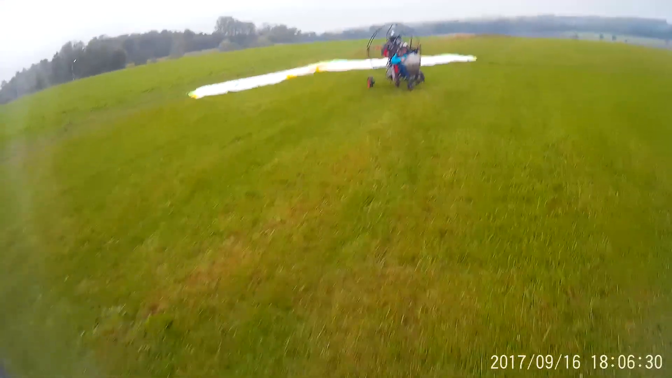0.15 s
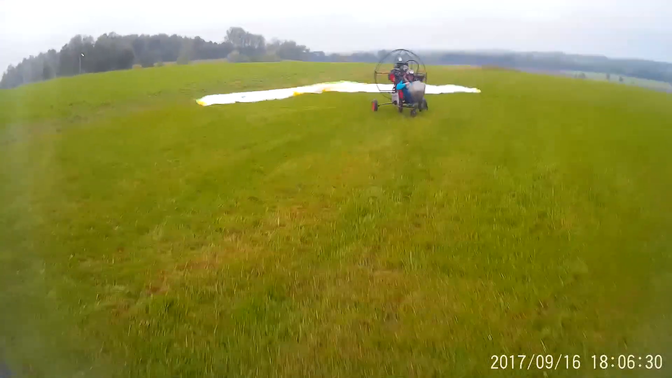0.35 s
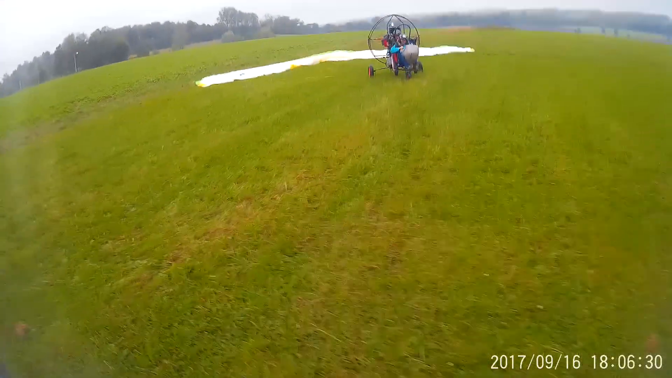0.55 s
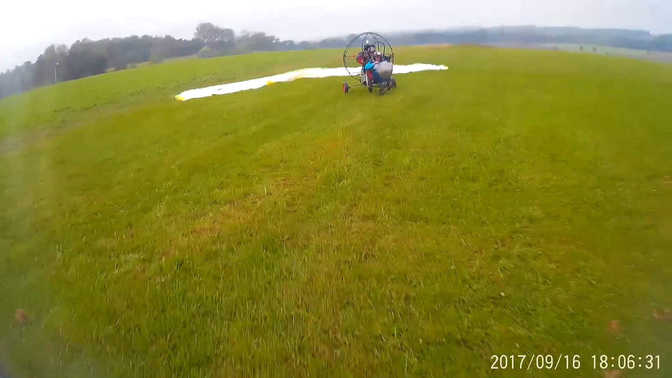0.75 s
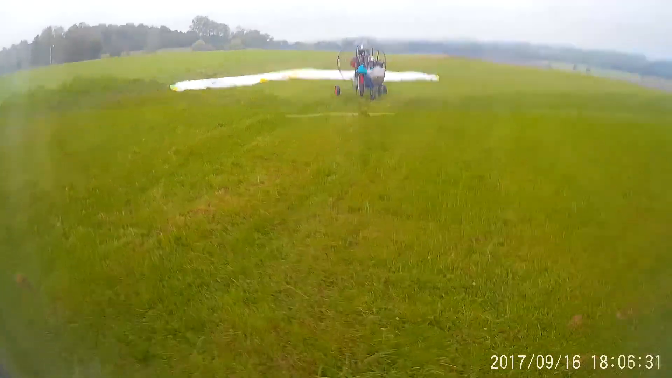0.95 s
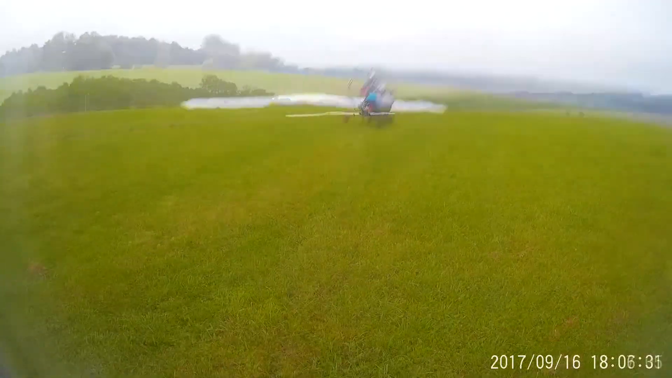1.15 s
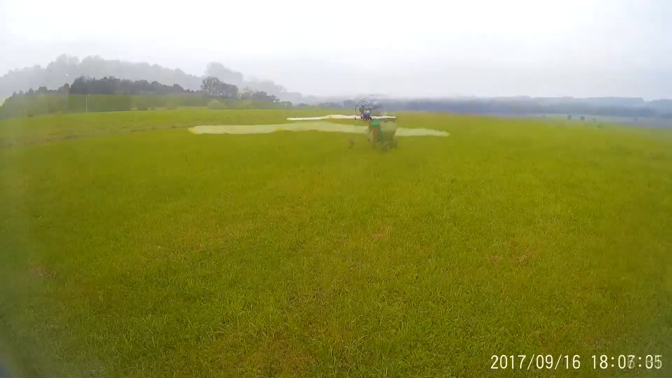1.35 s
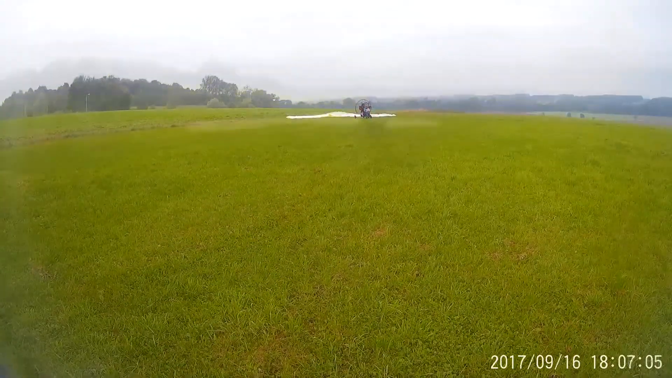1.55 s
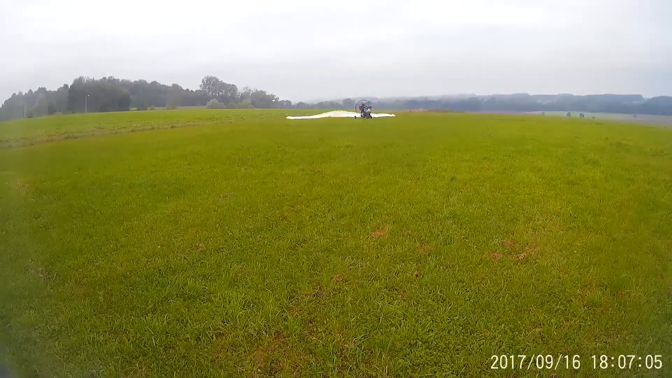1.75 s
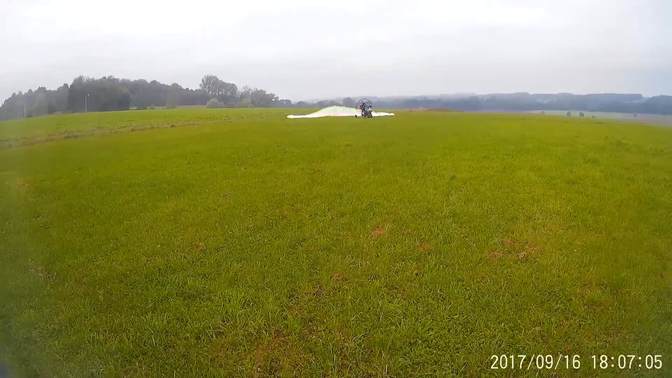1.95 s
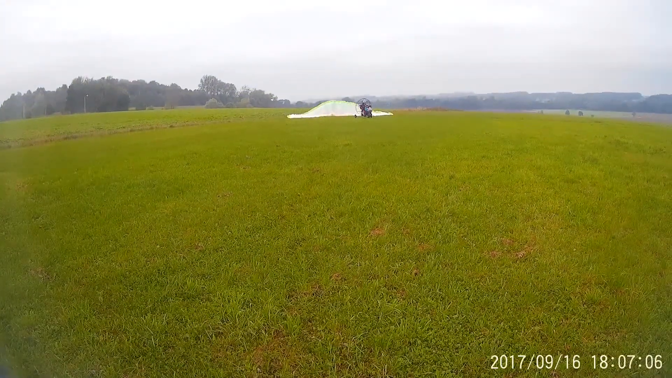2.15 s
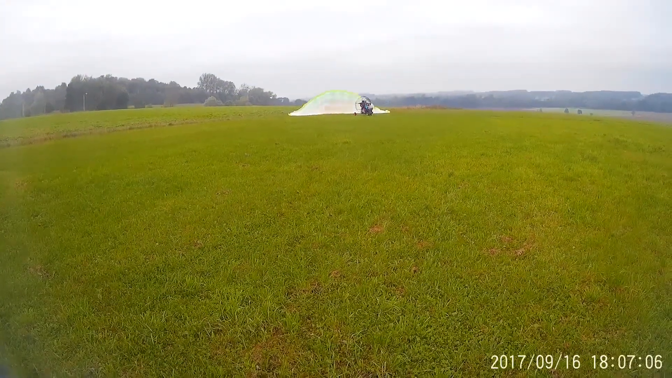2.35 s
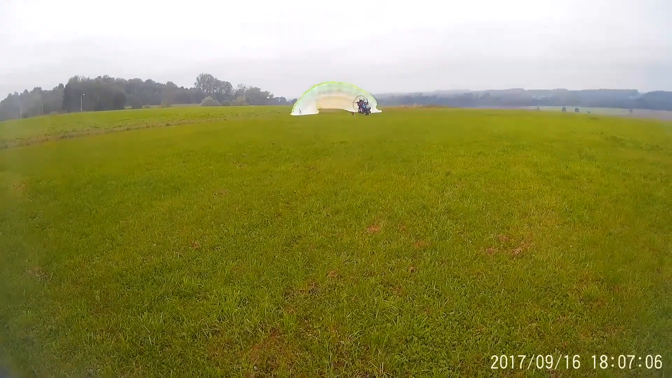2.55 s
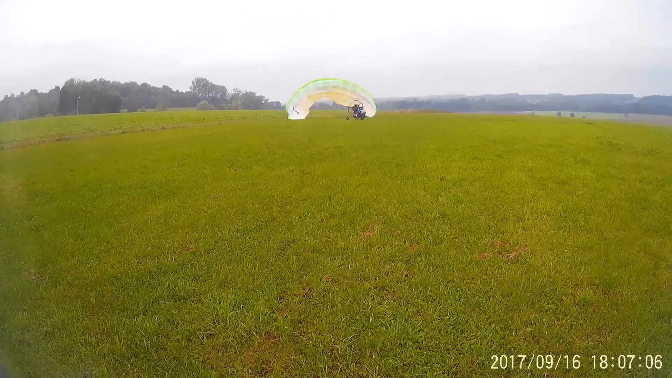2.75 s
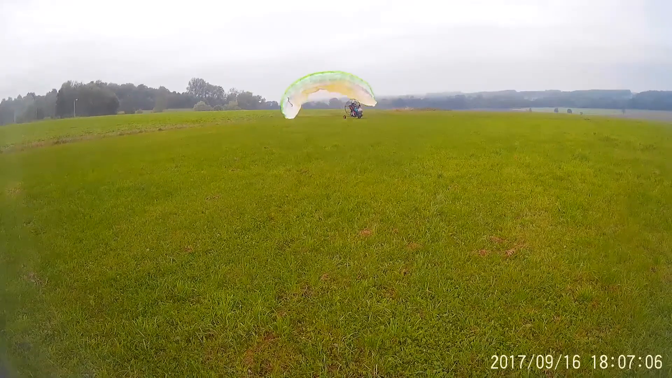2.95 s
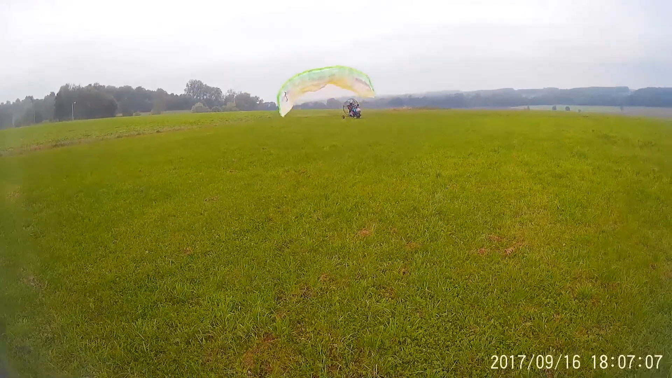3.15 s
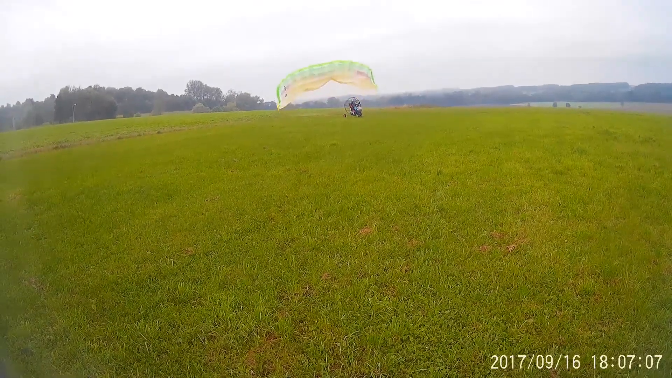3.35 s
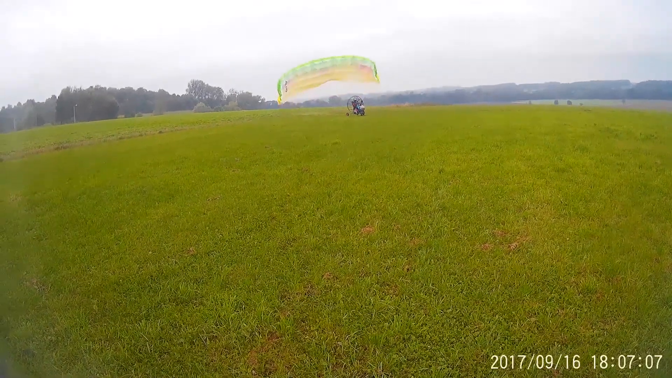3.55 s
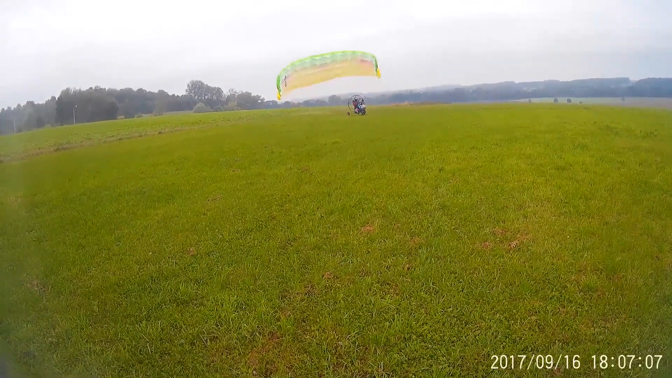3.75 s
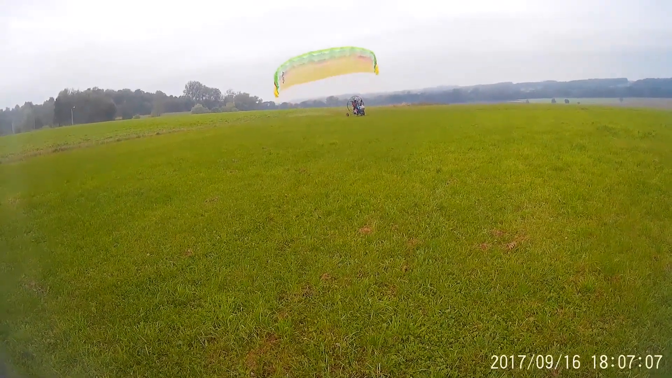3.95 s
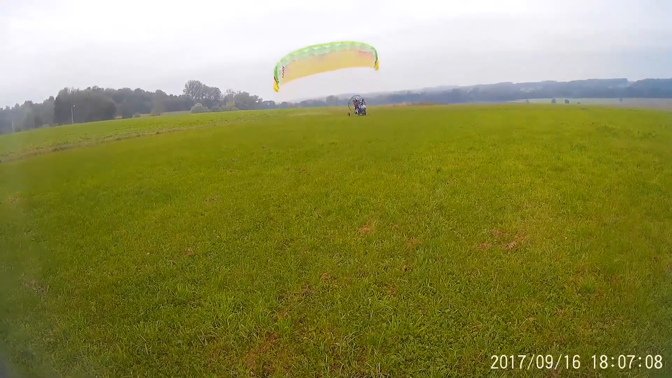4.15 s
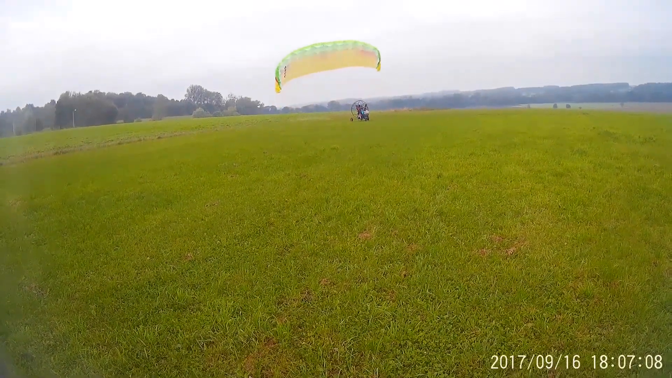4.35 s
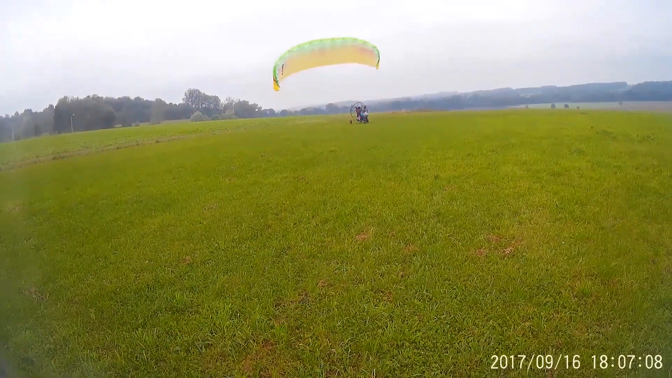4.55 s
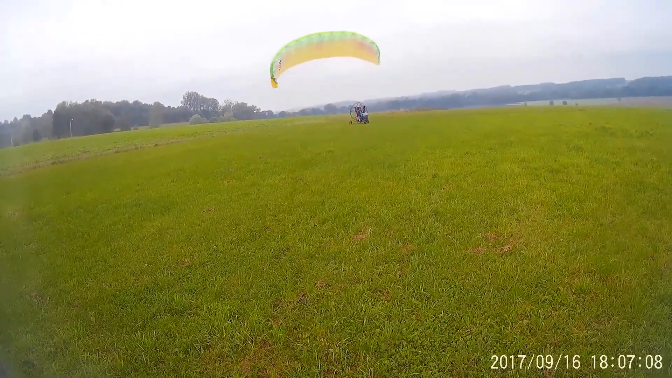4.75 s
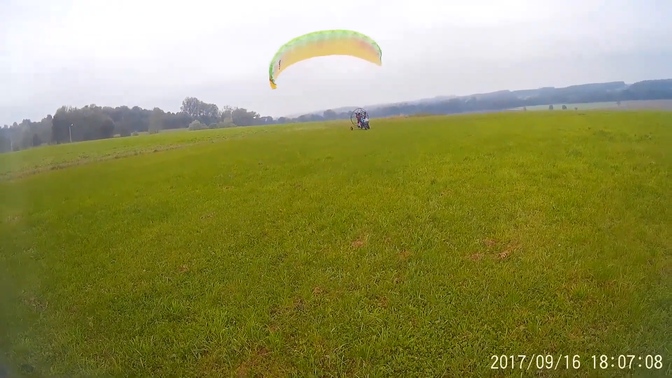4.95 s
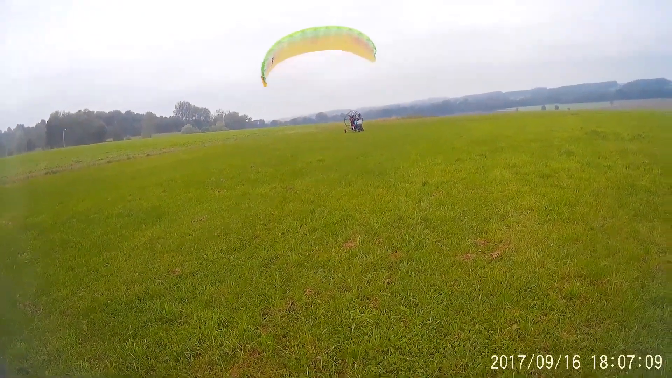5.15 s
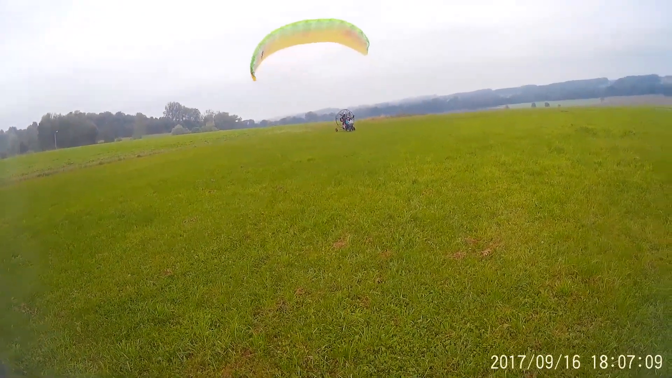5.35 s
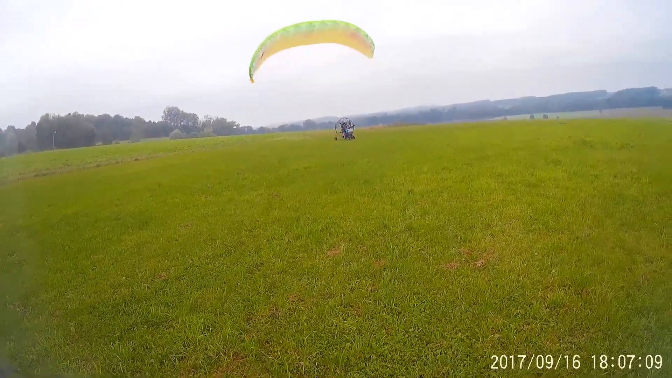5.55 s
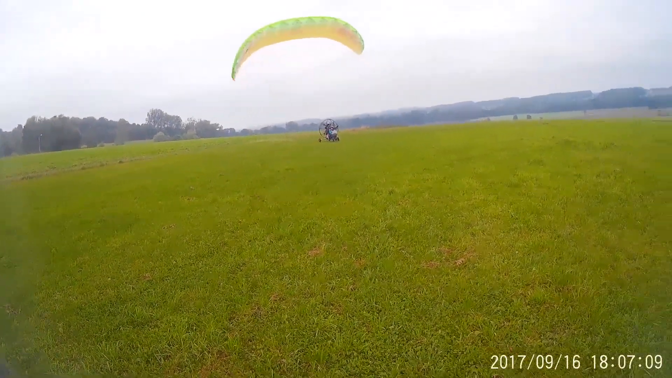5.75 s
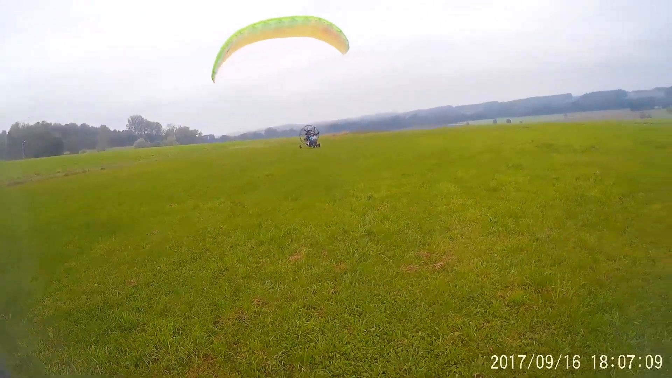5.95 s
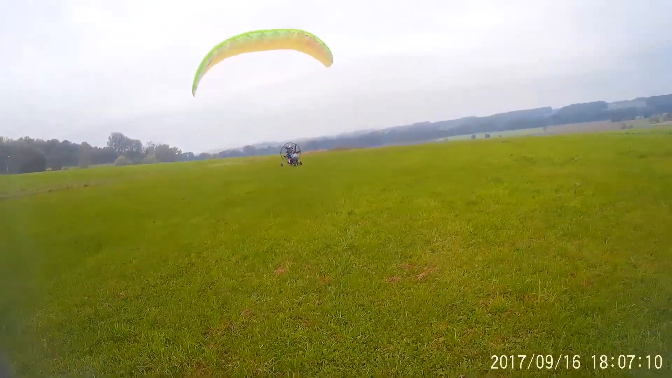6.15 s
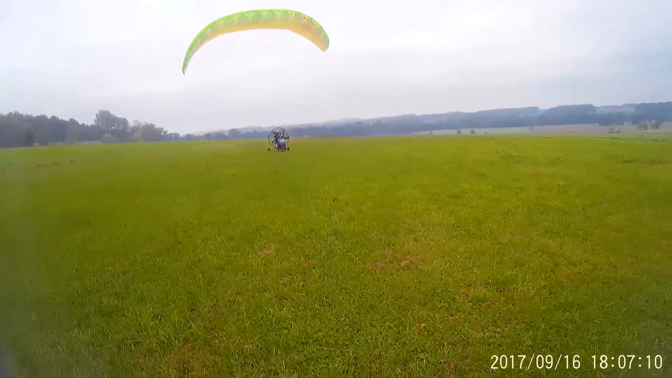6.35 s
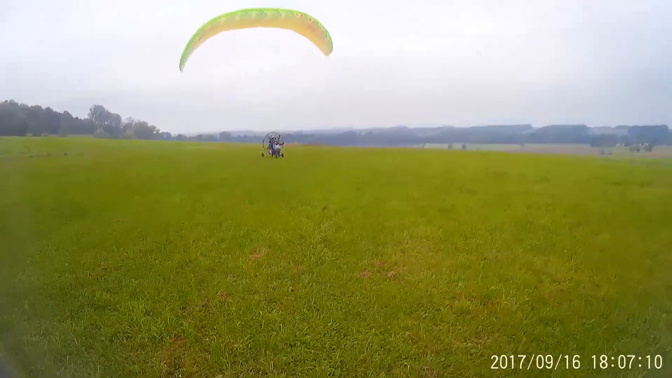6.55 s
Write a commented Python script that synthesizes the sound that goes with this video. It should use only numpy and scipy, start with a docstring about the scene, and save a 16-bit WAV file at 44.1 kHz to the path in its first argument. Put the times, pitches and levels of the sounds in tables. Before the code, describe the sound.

Quiet outdoor background with a few sharp taps and dull thumps close to the microphone, then a small two-part drone of engine and propeller at some distance. It revs up, settles into a fluttering buzz with rushing, torn air, and keeps growing brighter and louder without passing. The enclosed camera microphone makes it hollow and ringing. A last soft handling bump falls near the end.

```python
"""Paramotor trike take-off

A paramotor trike opens its throttle and takes off across a grass field, heard through a small camera's case.
Engine and propeller are two stacks of harmonics, geared slightly apart so that they beat.
Their rasp and the noise of torn air ring in the case's resonances near 2 kHz.
The hand knocks and clicks the case a few times; shaped noise makes a light wind rumble and a hiss."""
import sys
import numpy as np
from scipy import signal
from scipy.fft import rfft, irfft
from scipy.io import wavfile

SR = 44100
rng = np.random.default_rng(int(sys.argv[2]) if len(sys.argv) > 2 else 0)


def persist_wave(psi):
    """Save psi, clipped to +-1, as 16-bit WAV."""
    counts = np.round(np.clip(psi, -1, 1) * 32767).astype(np.int16)
    wavfile.write(sys.argv[1], SR, np.atleast_2d(counts).T)


N = 291060  # length [samples]


def from_db(db):
    """Decibels to gain."""
    return np.exp(np.asarray(db) * (np.log(10) / 20))


def rms_one(x):
    """The same sound at rms 1."""
    return x / np.sqrt(np.mean(x * x) + 1e-20)


def in_time(rows):
    """A (time [s], value) curve at every sample."""
    times, values = np.transpose(rows)
    return np.interp(np.arange(N) / SR, times, values)


def bins():
    """Frequency [Hz] of every bin of a full-length spectrum, at least 1."""
    return np.maximum(np.arange(N // 2 + 1) * SR / N, 1)


def colour(points):
    """Gain of a (frequency [Hz], level [dB]) spectrum at every bin, interpolated over log frequency."""
    hz, db = np.transpose(points)
    return from_db(np.interp(np.log(bins()), np.log(hz), db))


def tinted(x, gain):
    """A sound with the given gain at every bin; rms 1."""
    return rms_one(irfft(rfft(x) * gain, N))


def drift(rate):
    """Smooth random wander of rms about 1, low-passed at rate [Hz] and drawn at every 50th sample."""
    size = N // 50 + 2
    hz = np.arange(size // 2 + 1) * SR / N
    spectrum = rfft(rng.standard_normal(size)) / (1 + (hz / rate) ** 2)
    slow = rms_one(irfft(spectrum, size))
    return np.interp(np.linspace(0, size - 1, N), np.arange(size), slow)


def ring(x, hz, t60):
    """Two-pole resonator: a unit click sets a sine of height 1 ringing, 60 dB down after t60 [s]."""
    radius = from_db(-60 / (t60 * SR))
    angle = 2 * np.pi * hz / SR
    feedback = [1, -2 * radius * np.cos(angle), radius * radius]
    return signal.lfilter([0, np.sin(angle)], feedback, x + 1e-18)


def brighten(x, shelf_db, corner_hz):
    """Raises or lowers what lies above the corner."""
    top = irfft(rfft(x) / (1 + (corner_hz / bins()) ** 8), N)
    return x + (from_db(shelf_db) - 1) * top


def hiss():
    """Quiet field and microphone hiss: steadily coloured noise with a bump at 2 kHz."""
    # colour of the hiss: (frequency [Hz], relative level per Hz [dB])
    hiss_colour = [(100, 7.5), (250, 6.5), (450, 3), (700, -1.5), (1100, -3), (1550, -4.5), (2000, -1.5),
                   (2500, -6.5), (4000, -8.5), (7000, -10), (11500, -10.5), (14200, -15), (15800, -24)]
    # level of the hiss: (time [s], level [dB])
    hiss_level = [(0, -61.5), (.85, -63), (1.1, -65.5), (1.35, -63.5), (1.7, -59.5), (6.6, -62)]
    return from_db(in_time(hiss_level)) * tinted(rng.standard_normal(N), colour(hiss_colour))


def wind():
    """Wind and handling rumble on the case: low noise in small gusts, settling once the camera is held still."""
    # level of the rumble: (time [s], level [dB])
    wind_level = [(0, -58), (.45, -52), (1.1, -57), (1.3, -63.5), (6.6, -63)]
    # colour of the rumble: (frequency [Hz], relative level per Hz [dB])
    rumble_colour = [(12, 4), (25, -5.5), (50, -11.5), (100, -16), (200, -19), (400, -31.5), (1000, -40)]
    gusts_db = 0.5 * drift(rate=5.8)
    return from_db(in_time(wind_level) + gusts_db) * tinted(rng.standard_normal(N), colour(rumble_colour))


def knocks():
    """Dull knocks of the hand: each pulls and pushes the case once, and leaves it ringing low."""
    # (time [s], push peak [dB], push peak after centre [ms], ring [Hz], ring level re peak [dB])
    knock_list = [(0.289, -44.5, 1.8, 189, -13), (0.4127, -21.5, 0.76, 158, -11.5),
                  (0.444, -38, 1, 139, -19), (0.6222, -23.5, 0.96, 105, -23),
                  (0.6275, -24.5, 0.91, 103, -4), (5.048, -42.5, 1.4, 125, -1), (6.128, -47, 2.3, 140, -12),
                  (6.2971, -29, 1.04, 168, -13)]
    body_t60_s = 0.098
    out = np.zeros(N)
    for s, peak_db, half_ms, ring_hz, ring_db in knock_list:
        span = np.arange(round((s - .05) * SR), round((s + .25) * SR))
        t = span / SR - s
        u = t / (half_ms / 1000)
        push = u / (1 + u * u / 5) ** 3   # dips at u = -1, peaks at u = 1
        since = np.maximum(t, 0)
        tail = np.sin(2 * np.pi * ring_hz * since) * from_db(-60 * since / body_t60_s)
        out[span] += from_db(peak_db) * (push / push.max() + from_db(ring_db) * tail)
    return out


def clicks():
    """Taps and sharp snaps on the plastic case; a soft contact barely stirs its high modes."""
    # impulses: (time [s], level before the contact's low-pass [dB], hardness as that low-pass [Hz])
    click_list = [(0.4113, -17.5, 870), (0.6216, -20, 15100), (0.6226, -15.5, 8000), (0.6285, -22, 560),
                  (6.2970, -27, 400)]
    # modes of the case: (frequency [Hz], level [dB], decay by 60 dB [s])
    modes = [(313, -8, 0.023), (520, -12, 0.016), (1120, -13, 0.012), (1380, -8, 0.015), (1720, -5.5, .018),
             (2220, -3, 0.0057), (2720, 0.5, 0.0075), (3880, -4, 0.0049), (4630, -4.5, 0.0035),
             (5900, -1.5, 0.0027), (8230, -15, 0.0047), (9600, -11, .002), (12500, -22, 0.0026)]
    hits = np.zeros(N)
    for s, db, contact_hz in click_list:
        contact = signal.butter(4, contact_hz, fs=SR, output="sos")
        impulse = signal.unit_impulse(N, round(s * SR)) + 1e-18
        hits += from_db(db) * signal.sosfilt(contact, impulse)
    out = np.zeros(N)
    for k, (hz, db, t60) in enumerate(modes):
        out += (-1) ** k * from_db(db) * ring(hits, hz, t60)   # alternating polarity
    return out


def case_gain(hz):
    """Gain of the case's steep-sided resonances, which colour harmonics and rushing air alike."""
    # (centre [Hz], width [Hz], gain [dB])
    resonances = [(1053, 106, -15), (1406, 100, -11), (1802, 124, -5.5), (2002, 164, 1), (2212, 146, -0.5),
                  (2513, 100, -12), (2874, 178, -8.5), (3355, 220, -11), (4013, 425, -20.5),
                  (4670, 140, -22), (5500, 610, -23.5), (7340, 380, -32.5)]
    power = 1e-6
    for centre, width, db in resonances:
        skirt = 1 + ((hz - centre) / width) ** 2
        power = power + from_db(db) ** 2 / skirt ** 3
    return np.sqrt(power)


def rush(firings, blades):
    """Gas puffs at each firing and air torn by each blade: pulsing noise, ringing in the case; rms 1."""
    # propeller wash under the resonances: (frequency [Hz], level per Hz [dB])
    wash = [(25, -32), (60, -25), (110, -16), (200, -19), (330, -21), (500, -23.5), (750, -25),
            (1200, -23.5), (3000, -37), (8000, -42.5), (15000, -46.5)]
    puffs = 1 + 0.19 * np.cos(2 * np.pi * firings) + 0.034 * np.cos(2 * np.pi * blades)
    roughness = from_db(0.5 * drift(rate=51))
    air = rng.standard_normal(N) * puffs * roughness
    return tinted(air, np.hypot(case_gain(bins()), colour(wash)))


def harmonics(cycles, rate, orders, levels, low_flutter_db, high_flutter_db, leak_db):
    """Harmonics of a repeating pulse; moving air makes the short waves flutter more than the long ones."""
    boom, bark, whine, rasp = levels
    response = case_gain(bins()) + from_db(leak_db)   # the leak bypasses the resonances
    out = np.zeros(N)
    for order, level_db in orders:
        level = boom if order < 3 else bark if order < 8 else whine if order < 16 else rasp
        flutter_db = low_flutter_db + high_flutter_db * min(order / 12, 1) ** 2
        flutter = from_db(flutter_db * drift(rate=2 + 0.35 * order))
        swell = np.interp(order * rate, bins(), response)   # a line swells as it glides into a resonance
        phase = rng.random() * (order - 1)   # random start of each overtone [cycles]
        line = swell * flutter * np.sin(2 * np.pi * (order * cycles + phase))
        out += level * from_db(level_db) * rms_one(line)
    return out


def drone_levels(speed):
    """Gains of boom, bark and whine: all come up with engine speed; boom and bark grow as the trike nears."""
    # whine (orders 8-15) at full power: (time [s], level [dB])
    whine_level = [(1.5, -70), (1.9, -60.5), (2.7, -61), (3.5, -52), (4.7, -53), (5.7, -58.5), (6.6, -51.5)]
    # full pull from 117.4 firings/s up; below it the drone falls by 1 dB per firing/s
    power_db = -1.0 * np.maximum(117.4 - speed, 0)
    # the trike rolls closer, covering this share of the starting distance each second
    roll_s, closing_per_s = 1.32, 0.12
    rolled = closing_per_s * np.maximum(np.arange(N) / SR - roll_s, 0)
    approach_db = -20 * np.log10(np.maximum(1 - rolled, .1))
    # full-power level at the start of the roll, plus a share of the approach
    boom_db = -54 + 0.28 * approach_db     # orders 1-2
    bark_db = -65.5 + 1.7 * approach_db    # orders 3-7
    return from_db(power_db + np.array([boom_db, bark_db, in_time(whine_level)]))


def paramotor():
    """One crankshaft drives both; blades pass a little slower than firings: four to six throbs a second."""
    # engine speed: (time [s], firings per second [Hz])
    engine_speed = [(1.0, 91.9), (1.18, 98.8), (1.36, 110.2), (1.51, 115.0), (1.9, 116.9), (2.65, 125.7),
                    (2.83, 127.3), (3.43, 129.8), (4.03, 130.4), (4.33, 127.8), (4.51, 124.2),
                    (4.78, 127.1), (5.08, 127.6), (5.38, 126.1), (6.52, 131.1), (6.58, 131.1)]
    # upper rasp before the throttle gain, swelling with approach and moving air: (time [s], level [dB])
    rasp_level = [(1.11, -72), (1.37, -55), (1.83, -47.5), (1.95, -49), (2.37, -43), (2.47, -44),
                  (4.23, -41.5), (4.31, -40), (4.43, -43.4), (4.61, -44), (4.89, -39.5), (5.01, -42.8),
                  (5.95, -38.5), (6.03, -40.5), (6.15, -36), (6.29, -35.5), (6.35, -38.5), (6.59, -37)]
    # exhaust: (multiple of the firing rate, level re its boom, bark, whine or rasp [dB])
    exhaust_orders = [(1, -1.2), (2, -5.5), (3, 0.3), (4, -9.5), (5, -22), (6, -15), (7, -14.5), (8, -8),
                      (9, -28), (10, -12.5), (11, -8.5), (12, -11), (13, -16), (14, -0.5), (15, -2.5),
                      (16, -10), (17, -17), (18, -15), (19, -17.5), (20, -14.5), (21, -17), (22, -18),
                      (23, -22), (24, -16.5), (25, -35), (26, -20.5), (27, -21)]
    # propeller: (multiple of the blade rate, level re its boom, bark, whine or rasp [dB])
    propeller_orders = [(1, -10.5), (2, -18.5), (3, -13), (4, -19), (5, -34), (6, -65), (7, -17), (8, -14),
                        (9, -19.5), (10, -39), (11, -17.5), (12, -20), (13, -31), (14, -13), (15, -42),
                        (16, -30)]
    # brightness of the rushing air as the trike gathers speed: (time [s], treble shelf [dB])
    treble = [(1.2, -0.5), (2.5, -1), (4.2, 1.5), (5.2, 2), (6.0, 3), (6.6, 2)]
    blades_per_firing = .952

    speed = in_time(engine_speed)
    turns = np.cumsum(speed) / SR   # counted in firings
    firings = turns + 0.0067 * drift(rate=7.3)   # no two firings come exactly on time
    blades = blades_per_firing * turns

    throttle = in_time([(.9, 0.46), (1.15, 0.95)])   # (time [s], gain)
    air_flutter_db = 0.94 * drift(rate=17)   # on the rasp's way through the air
    rasp = throttle * from_db(in_time(rasp_level) + air_flutter_db)
    levels = (*drone_levels(speed), rasp)

    exhaust = harmonics(firings, speed, exhaust_orders, levels,
                        low_flutter_db=0.5, high_flutter_db=3.0, leak_db=-35)
    propeller = harmonics(blades, blades_per_firing * speed, propeller_orders, levels,
                          low_flutter_db=2.0, high_flutter_db=10.0, leak_db=-23)
    air = from_db(-1.5) * rasp * rush(firings, blades)
    return exhaust + propeller + brighten(air, in_time(treble), corner_hz=2900)


def scene():
    """Hiss, wind and handling under the paramotor, in one channel."""
    return (hiss() + wind() + knocks() + clicks() + paramotor())[None]


def record(dry):
    """The top is cut steeply at 15750 Hz."""
    return irfft(rfft(dry) / np.sqrt(1 + (bins() / 15750) ** 300), N)


dry = scene()
out = record(dry)
persist_wave(out)
```